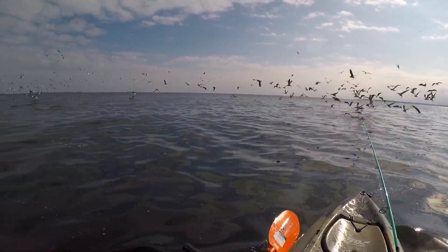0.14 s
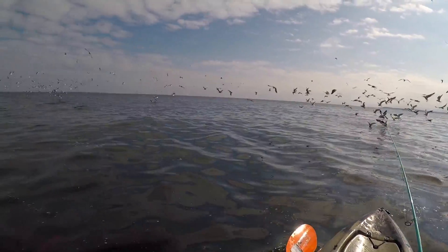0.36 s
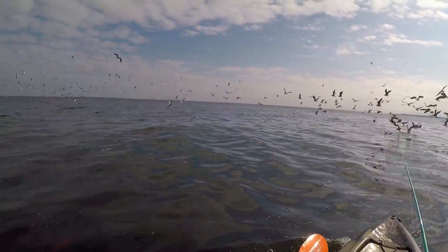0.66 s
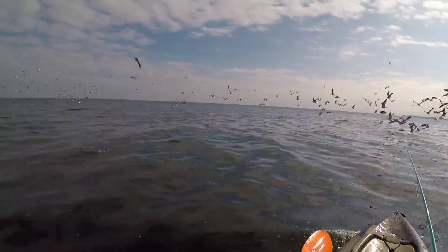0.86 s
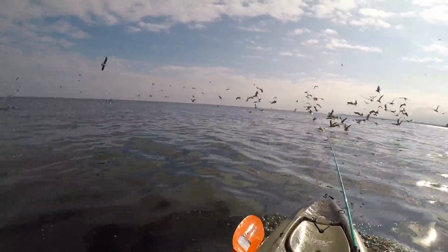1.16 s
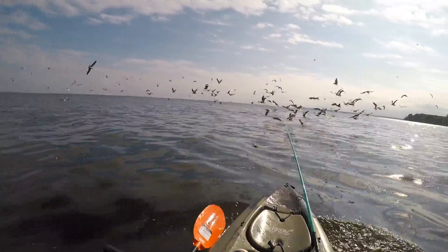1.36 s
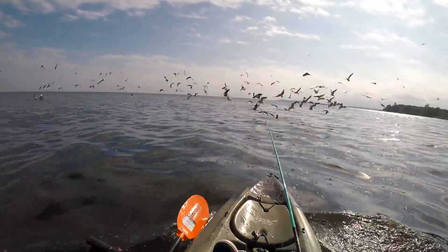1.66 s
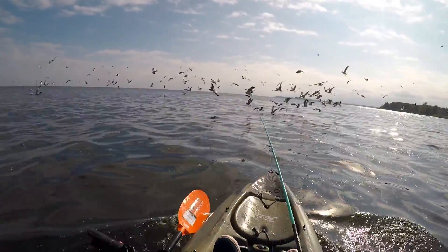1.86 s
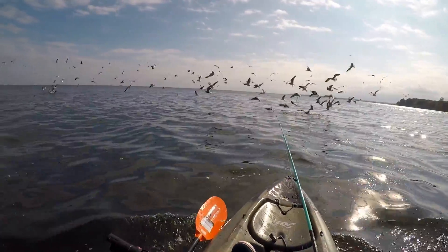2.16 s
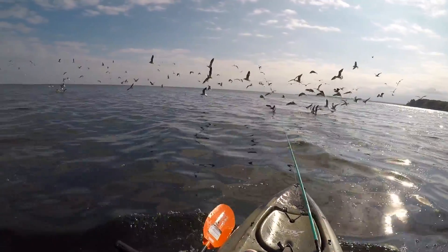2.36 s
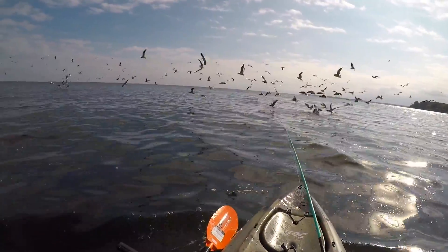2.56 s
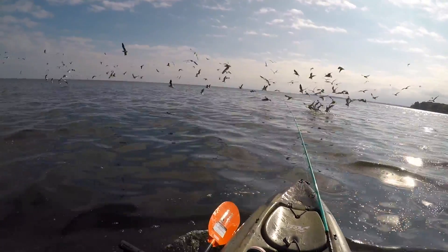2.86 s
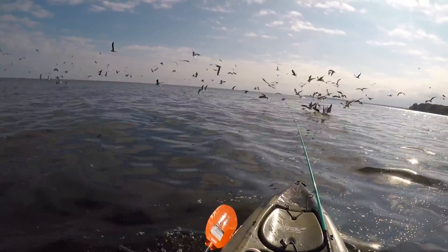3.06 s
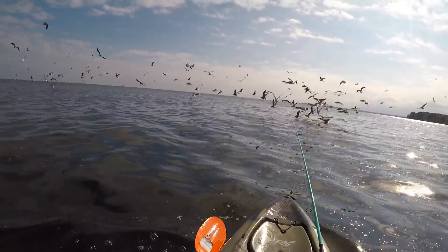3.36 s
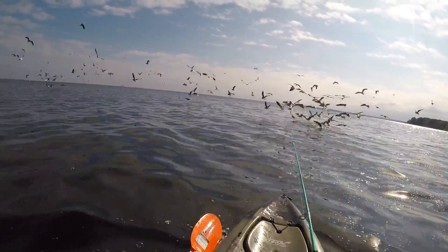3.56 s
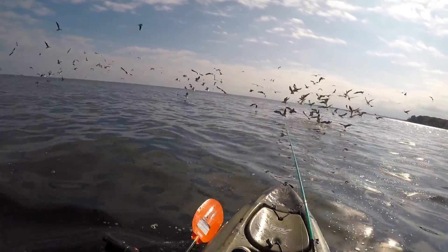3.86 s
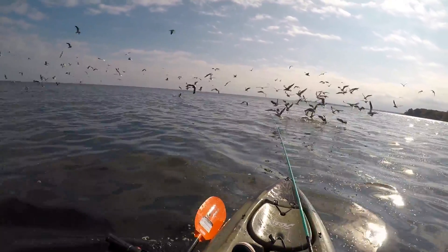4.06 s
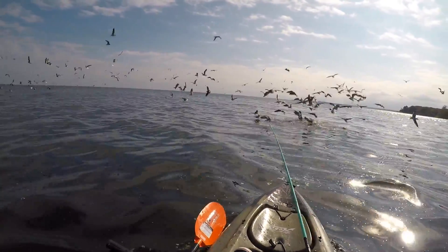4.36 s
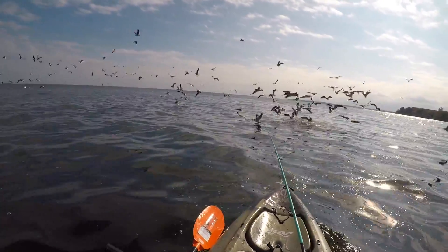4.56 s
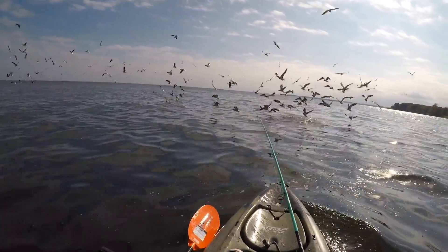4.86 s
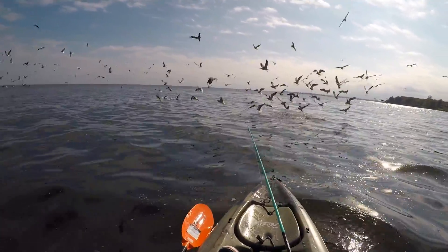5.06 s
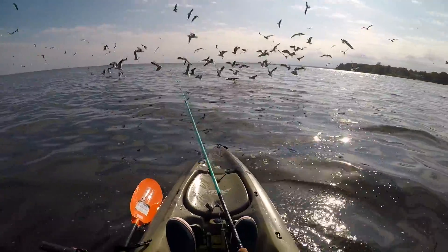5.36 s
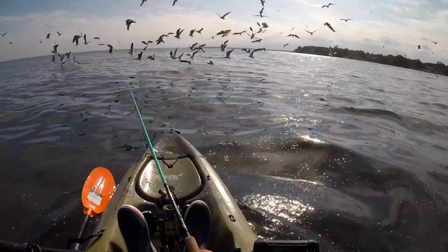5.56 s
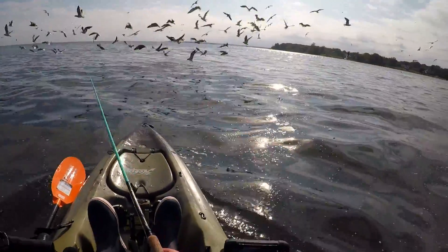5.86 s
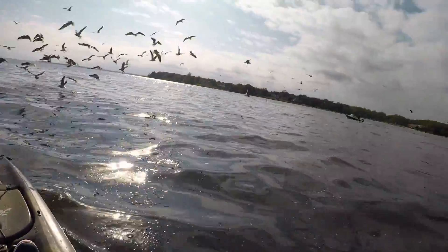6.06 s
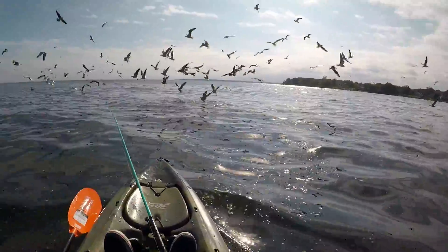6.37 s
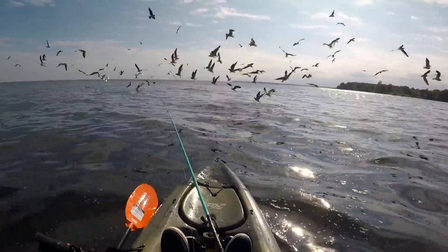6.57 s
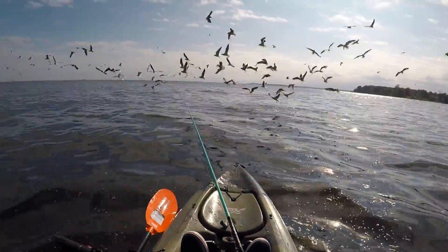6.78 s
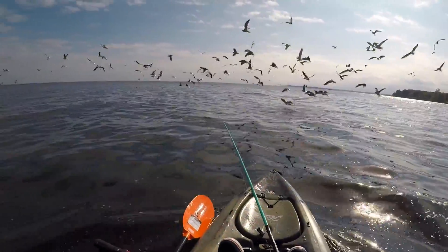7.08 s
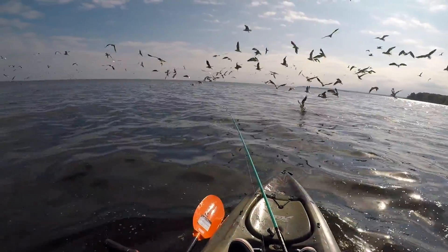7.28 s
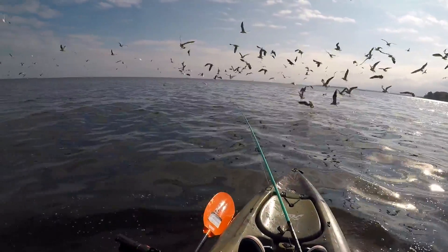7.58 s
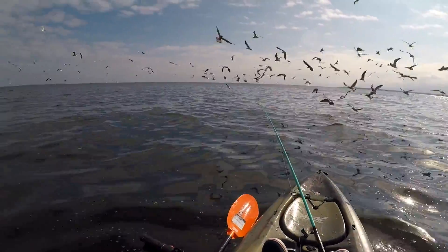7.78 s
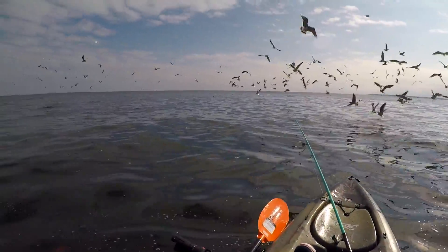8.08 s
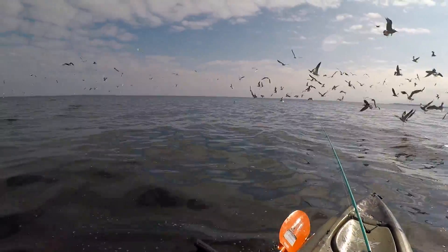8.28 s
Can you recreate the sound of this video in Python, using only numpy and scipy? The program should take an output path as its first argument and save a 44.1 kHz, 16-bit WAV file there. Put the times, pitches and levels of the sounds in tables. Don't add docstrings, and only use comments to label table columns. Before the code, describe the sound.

The sound cuts straight into a flock of gulls feeding over open water, heard from a small boat. Throughout, distant cries merge into a wavering chorus while nearer birds give short hoarse squawks, rasping screams and clear gliding calls. High thin whistles come around 0.5 and 1 s, a loud arched cry at 1.7 s, and a steadier droning call from 2.7 to 3.3 s. Shrill warbles crowd 4 to 5.1 s, with swooping cries near 5.7 s. The far flock thins after about 6 s; low moans appear around 6.5 to 7.3 s, then a shrill wavering call, and the chorus swells again at the end. Low wind rumbles and puffs unevenly across left and right, gusting at the start, near 3.6 s and most strongly at 7.5 s. Faint water hiss continues underneath, with small hull knocks between 3.2 and 4.9 s and occasional tiny tackle clicks. Treble is dull; there is almost no reverberation.

```python
import sys
import numpy as np
from scipy import signal
from scipy.fft import rfft, irfft, next_fast_len
from scipy.io import wavfile
from scipy.ndimage import uniform_filter1d

SR = 44100
rng = np.random.default_rng(int(sys.argv[2]) if len(sys.argv) > 2 else 0)


def attenuation_scalar(level_db):
    decades = np.asarray(level_db, float) / 20
    return 10 ** decades


def persist_wave(psi):
    counts = np.round(np.clip(psi, -1, 1) * 32767).astype(np.int16)
    wavfile.write(sys.argv[1], SR, np.atleast_2d(counts).T)


N = 371760
T = np.arange(N) / SR

# [t/s, f/Hz, level/dB]
SOLO_SHRILL = [
    [(4.0, 3070, -45), (4.05, 3200, -43.5), (4.104, 3290, -41), (4.132, 3050, -36), (4.164, 3140, -39),
     (4.19, 3010, -40), (4.224, 3116, -41), (4.246, 2960, -39.5), (4.275, 2820, -46)],
    [(4.39, 3030, -37.5), (4.44, 3196, -38), (4.49, 3420, -39.5), (4.546, 3210, -42.5), (4.56, 3150, -53)],
    [(5.58, 2950, -43), (5.62, 2950, -43.5), (5.672, 3430, -44), (5.7, 3195, -41), (5.74, 3310, -41.5),
     (5.79, 3010, -39), (5.835, 2840, -44)],
    [(3.67, 3580, -49), (3.716, 3470, -50), (3.754, 3360, -57), (3.776, 3200, -42), (3.9, 3300, -55)],
    [(3.335, 2900, -56), (3.363, 3257, -40), (3.389, 2920, -54), (3.425, 2760, -43)],
    [(.45, 5140, -44), (.5, 5240, -40), (.56, 5320, -41.5), (.585, 5250, -41), (.62, 5040, -56)],
    [(.98, 4875, -47), (1.0, 5420, -43), (1.052, 5600, -52), (1.094, 5260, -48), (1.13, 4550, -56)],
    [(7.13, 3060, -54), (7.2, 3190, -43), (7.235, 3140, -39), (7.25, 2984, -35), (7.275, 3020, -54),
     (7.38, 2970, -51), (7.45, 3010, -46)],
    [(6.55, 2770, -54), (6.63, 2770, -56), (6.68, 2580, -60), (6.73, 2520, -59)],
]
SOLO_OPEN = [
    [(7.5, 2200, -41), (7.56, 2250, -51.5), (7.63, 2406, -47), (7.676, 2180, -41), (7.704, 2137, -43.5),
     (7.765, 2340, -49), (7.8, 2314, -50)],
    [(7.575, 2450, -64), (7.619, 3010, -48), (7.663, 3120, -51), (7.69, 3050, -45), (7.8, 3040, -59)],
    [(5.735, 2380, -45), (5.777, 2446, -46), (5.843, 2544, -41.5), (5.9, 2430, -42.5), (5.955, 2420, -50),
     (5.973, 2014, -45.5), (5.99, 2400, -49), (6.02, 2430, -56)],
    [(2.53, 2900, -50), (2.57, 2540, -50), (2.61, 2430, -53), (2.685, 2460, -57)],
    [(3.765, 2270, -52), (3.787, 2620, -48), (3.825, 2140, -55), (3.87, 2190, -54), (3.93, 2350, -49)],
    [(4.28, 2360, -40), (4.31, 2250, -41), (4.335, 2190, -41), (4.355, 2330, -46)],
]
SOLO_ROUND = [
    [(3.24, 3500, -52), (3.286, 3750, -47), (3.34, 3870, -47), (3.445, 3666, -50), (3.53, 3770, -48.5),
     (3.6, 3570, -49), (3.66, 3320, -51)],
    [(3.37, 3250, -52), (3.396, 2220, -44.5), (3.435, 2240, -42.5)],
    [(3.43, 2450, -59), (3.465, 2800, -58), (3.49, 2915, -52), (3.528, 2174, -46), (3.545, 2000, -40)],
    [(5.225, 4700, -41), (5.249, 4200, -38), (5.26, 3950, -50)],
    [(1.665, 3490, -43), (1.73, 3800, -35), (1.8, 3830, -38.5), (1.83, 3720, -36), (1.87, 3770, -38),
     (1.93, 3600, -41.5), (2.02, 3210, -42)],
]
SOLO_LOW = [
    [(6.615, 1070, -47), (6.69, 1133, -54), (6.73, 1093, -52), (6.83, 1136, -48.5), (6.92, 1070, -48.5),
     (7.05, 1120, -59)],
    [(7.85, 1164, -59), (7.92, 1116, -51.5), (7.99, 1088, -54)],
    [(8.06, 1510, -56), (8.1, 1540, -57), (8.18, 1497, -53)],
    [(6.483, 1194, -56), (6.52, 1440, -50.5), (6.556, 1530, -55)],
]
SOLO_ARCH = [
    [(6.97, 1440, -46), (7.03, 1647, -42.5), (7.12, 1615, -43.5), (7.23, 1513, -40.5), (7.28, 1390, -50)],
]
SOLO_TWIN = [
    [(.33, 3510, -48), (.41, 3330, -49), (.44, 3220, -58), (.5, 3030, -60)],
    [(4.668, 1200, -51), (4.7, 1540, -47), (4.72, 1950, -46)],
    [(3.335, 1400, -54), (3.365, 1690, -46.5), (3.385, 1440, -47)],
    [(4.75, 3330, -42), (4.79, 3540, -35.5), (4.83, 3680, -39), (4.89, 3620, -35.5), (4.94, 3730, -36)],
    [(4.955, 3560, -41), (5.01, 3300, -38.5), (5.05, 3430, -35.5), (5.09, 3250, -36)],
    [(5.09, 3530, -50), (5.12, 3300, -50)],
    [(5.635, 3200, -39), (5.69, 2940, -44), (5.76, 2650, -50)],
    [(2.63, 3200, -50), (2.655, 2880, -46), (2.68, 3300, -46), (2.7, 3000, -50)],
]
SOLO_DRONE = [
    [(2.655, 2100, -52), (2.72, 2090, -47), (2.84, 2115, -45), (2.93, 2185, -44), (2.97, 2150, -52)],
    [(3.05, 2180, -44), (3.15, 2224, -42.5), (3.22, 2360, -42.5), (3.29, 2300, -49.5), (3.315, 1950, -41)],
]
SOLO_BURRED = [
    [(4.8, 2880, -48), (4.818, 3080, -38), (4.842, 2910, -42), (4.886, 3242, -39.5), (4.922, 2836, -41.5),
     (4.97, 3090, -40.5), (5.02, 2900, -47)],
    [(4.575, 3000, -50), (4.61, 2900, -47.5), (4.645, 2760, -50)],
]
# [level/dB of partial 1, 2, 3, ..]
SOLO_PARTIALS = [
    (-3, 0, -29.5),
    (-9.5, 0.5, -5, -17.5),
    (0, -13.5, -38),
    (-9.5, -6.5, 2.5, -1.5, -1.5, -13.5, -26, -19),
    (-19.5, -10.5, 2, -9.5, -10, -15.5),
    (0.5, -7.5, -28),
    (0, -11, -12, -32),
    (-9.5, 0.5, -26),
]
# [t/s, length/s, f/Hz, glide/share of pitch, level/dB]
MELLOW = [(0.36, 0.23, 2400, -0.02, -55), (0.37, 0.15, 1070, -0.072, -51),
          (0.845, 0.12, 2300, -0.027, -48.5), (.96, .1, 2180, 0.0063, -49), (.64, .09, 2400, -.03, -54),
          (0.96, 0.15, 2400, 0.025, -45.5), (1.32, 0.245, 2260, -0.038, -45.5),
          (1.235, 0.069, 1950, 0.056, -43), (1.05, .1, 2300, .01, -49), (2.015, 0.15, 1880, -0.032, -49.5),
          (1.85, 0.24, 2350, -.06, -48), (2.175, .07, 2400, -.02, -46.5), (2.2, 0.107, 2150, .04, -45),
          (2.35, 0.16, 1070, 0.1, -48.5), (2.3, 0.108, 1170, -0.043, -42), (2.4, 0.071, 2400, 0.032, -46.5),
          (4.735, 0.025, 2350, 0.018, -43), (3.456, 0.068, 1437, 0.037, -49.5),
          (3.715, .09, 2050, -0.0043, -58), (5.454, 0.38, 2080, 0.073, -50.5),
          (9, 0.049, 2300, -0.143, -50.5), (7.72, 0.121, 2700, 0.032, -46.5),
          (0.011, 0.044, 2230, -0.017, -48)]
ROUND = [(1.305, 0.068, 1180, -0.017, -41), (1.375, .1, 1115, 0.0016, -53),
         (1.3, 0.062, 3720, -0.052, -45.5), (2.17, .14, 3200, -.01, -45.5), (3.815, .09, 3900, -.04, -52),
         (3.82, .09, 3030, 0.087, -54), (2.73, .06, 4150, -0.056, -44), (8.36, 0.072, 4150, 0.076, -50.5),
         (1.853, 0.11, 1200, -0.04, -47.5), (3.475, 0.038, 3400, 0.15, -49.5),
         (4.49, 0.076, 3330, -0.042, -42.5), (4.002, 0.11, 1080, -0.012, -49),
         (4.495, 0.14, 3900, -0.04, -50), (6.9, 0.051, 3200, 0.109, -44.5),
         (.685, 0.029, 2750, 0.016, -51.5)]
OPEN = [(.095, 0.22, 2380, -.03, -56), (.82, .2, 2230, .03, -52), (0.013, 0.044, 2280, -0.086, -45),
        (0.044, .06, 3340, -0.06, -53.5), (1.571, 0.15, 2390, 0.072, -50), (4.32, 0.053, 2900, 0.053, -52),
        (4.99, 0.235, 2350, -0.012, -45.5), (5.56, 0.14, 2380, 0.05, -47.5),
        (6.193, 0.24, 1580, -0.051, -45.5), (8.2, 0.09, 1127, -0.054, -57), (7.7, 0.093, 1480, 0.11, -46),
        (1.275, 0.041, 2330, -0.03, -44), (1.18, .03, 2150, .08, -47), (1.335, .04, 2280, -.1, -49),
        (7.45, .18, 2370, .04, -50.5), (4.6, .05, 2100, 0.057, -50)]
SHRILL = [(1.2, 0.065, 3000, -0.029, -46), (4.5, 0.051, 4200, 0.026, -48), (.772, 0.1, 3260, 0.0081, -51.5),
          (.5, .13, 3080, -.01, -56), (2.165, 0.15, 1385, -0.05, -48.5), (3.04, 0.115, 2900, 0.066, -47),
          (1.122, 0.04, 3150, .01, -45), (3.4, .09, 1140, .03, -48), (7.0, 0.05, 3170, 0.02, -47.5)]
BILL_HZ = (2400, 3935, 4820, 5700)
# [t/s, peak level/dB, length/s]
HOARSE_SQUAWKS = [(0.2092, -34.5, 0.11), (0.2917, -26.5, 0.051), (0.86, -28.5, 0.051), (1.4996, -31, 0.074),
                  (1.8466, -28, 0.042), (2.1244, -22, 0.034), (2.5194, -23, 0.039), (2.8384, -21, 0.048),
                  (2.9494, -28, 0.035), (3.059, -27, 0.11), (3.5494, -29.5, 0.068), (3.91, -31, 0.07),
                  (4.2489, -44, 0.054), (4.3489, -24.5, 0.058), (4.7047, -24, 0.071),
                  (5.2983, -35.5, 0.055), (5.528, -23.5, 0.076), (6.06, -33.5, 0.027), (6.41, -28.5, 0.052),
                  (6.5694, -35.5, 0.066), (7.235, -31.5, 0.039), (7.375, -37, 0.022), (7.4066, -29, 0.031),
                  (5.70, -30, .03), (5.83, -31, 0.045), (7.8, -33, 0.057), (1.93, -31, 0.036),
                  (2.3, -33, .04), (8.176, -31.5, 0.072), (8.345, -34.5, 0.1)]
CLEAR_SQUAWKS = [(0.7693, -25, 0.051), (2.455, -27.5, 0.036), (3.3508, -31, 0.084), (3.777, -33.5, 0.049),
                 (6.1456, -24.5, 0.043), (6.9327, -21, 0.039), (7.47, -27, 0.03), (7.235, -30, .03)]
SCREAMS = [(1.1, -23.5, 0.06), (1, -27.5, 0.07), (1.8, -30.5, 0.21), (2.2, -29.5, 0.21), (3, -28.5, .05),
           (3, -29.5, 0.24), (0.5, -30.5, 0.092), (4, -33, 0.11), (4.5, -32.5, 0.085), (5, -35, .05),
           (5, -32, 0.11), (3.0, -32, .16), (2.32, -35, 0.089), (4, -32, .08), (7.5, -41.5, 0.18)]
# [f/Hz, width/Hz, level/dB]
THROAT = [(2154, 1115, -6), (3637, 514, 1), (4324, 444, -0.5), (5945, 1120, -1)]
# [f/Hz, level/dB]
GAPE = [(1500, -1), (2200, 1.5), (2650, -2), (3250, 3), (4200, 1.5), (4950, -5), (5800, 3), (7400, -2)]
# [t/s, level/dB]
CHORUS = [(0.0, -48), (1.24, -39.5), (1.62, -42.5), (1.9, -40.5), (2.79, -39.5), (2.98, -39), (3.3, -41),
          (3.57, -48), (3.83, -43.5), (4.25, -38), (4.69, -46), (4.95, -38), (5.4, -41), (5.75, -40),
          (5.96, -49), (6.88, -47), (7.0, -45), (8.3, -48), (8.43, -35.5)]
# [t/s, left minus right level/dB]
BEARING = [(0.0, -0.5), (2.02, -0.5), (2.39, -1.5), (2.74, 0), (3.12, -1.5), (6.17, 3), (6.24, 0),
           (6.81, 1.5), (7.16, 2), (7.3, 0.5), (7.84, -1), (7.98, -6), (8.03, 0), (8.43, -4)]
# [t/s, level/dB, left minus right level/dB]
WIND = [(0.0, -42, -2.5), (0.33, -49.5, 5), (1.74, -44.5, 0.5), (1.85, -47.5, 10), (1.95, -54.5, -3),
        (2.13, -50, 1), (2.79, -52, 1.5), (3.64, -40.5, 0.5), (4.53, -55, -3), (5.71, -51, -6.5),
        (5.75, -46.5, -5.5), (6.1, -46, 3.5), (6.17, -45, 1.5), (6.76, -50.5, -1.5), (7.49, -38.5, 3.5),
        (7.61, -49, 1), (8.19, -43.5, -1.5), (8.43, -40.5, 4.5)]
# [f/Hz, level/dB per Hz]
WIND_COLOUR = [(14, -24), (54, -8.5), (103, -9), (170, -8.5), (260, -6.5), (500, -24.5), (900, -41.5),
               (1980, -98.5)]
# [t/s, length/s, extra level/dB of the upper edge]
BUFFETS = [(7.33, 0.047, 7.5), (7.57, 0.037, 8), (1.73, 0.042, 5), (3.22, 0.042, 4.5), (4.35, .1, 5),
           (4.75, 0.12, 5), (2.51, 0.36, 2), (6.52, .04, 3.5)]
# [f/Hz, level/dB per Hz]
SEA_COLOUR = [(290, -19.5), (940, -10.5), (1900, -10.5), (6180, -24), (7780, -34.5), (10100, -30.5),
              (12000, -31.5), (17100, -14.5)]
# [t/s, peak level/dB]
WAVELETS = [
    (3.218, -31.5),
    (3.541, -27),
    (4.62, -29.5),
    (4.883, -33),
]
# [t/s, peak level/dB]
TACKLE = [
    (.845, -41),
    (1.85, -47),
    (2.569, -37),
    (4.249, -32),
]
# [f/Hz, level/dB]
WIDTH = [(100, 0), (400, -4), (1200, 1), (2200, 7), (5000, 0.5), (9000, 13.5), (12000, -1.5)]


def level(x, db):
    return x * attenuation_scalar(db) / np.sqrt(np.mean(x ** 2))


def colour(x, points):
    hz, db = np.transpose(points)
    size = next_fast_len(N, True)
    f = np.arange(size // 2 + 1) * SR / size + 1
    gain = attenuation_scalar(np.interp(np.log(f), np.log(hz), db))
    return irfft(rfft(x, size) * gain, size)[..., :N]


def walk(rate, size=N):
    hold = max(int(SR / rate), 2)
    steps = np.repeat(rng.standard_normal(size // hold + 1), hold)
    return 1.3 * uniform_filter1d(uniform_filter1d(steps, hold), hold)[:size]


def lean(points):
    return attenuation_scalar(np.outer([.5, -.5], np.interp(T, *np.transpose(points))))


def add(out, x, s, pan_db):
    db_per_sample = 3
    for c, sign in enumerate((1, -1)):
        i = int(s * SR) + max(int(-sign * pan_db / db_per_sample), 0)
        out[c, i:i + len(x)] += x[:N - i] * attenuation_scalar(sign * pan_db / 2)


def voice(hz, partials, waver, flutter_db):
    size = len(hz)
    phase = 2 * np.pi * np.cumsum(hz * (1 + waver * walk(180, size=size))) / SR
    stack = sum(attenuation_scalar(db) * np.sin(k * phase + k * k) for k, db in partials)
    to_edge = np.minimum(np.arange(size), np.arange(size)[::-1])
    fade = np.clip(to_edge / (0.0099 * SR), 0, 1)
    return np.sqrt(2) * stack * fade * attenuation_scalar(flutter_db * walk(62.1, size=size))


def throat(x):
    out = 0
    for k, (hz, width, db) in enumerate(THROAT):
        edges = (hz - width / 2, hz + width / 2)
        band = signal.butter(1, edges, "band", fs=SR, output="sos")
        out = out + (-1) ** k * attenuation_scalar(db) * signal.sosfilt(band, x)
    return out


def soloists():
    out = np.zeros((2, N))
    kinds = (SOLO_SHRILL, SOLO_OPEN, SOLO_ROUND, SOLO_LOW, SOLO_ARCH, SOLO_TWIN, SOLO_DRONE, SOLO_BURRED)
    for cries, dbs in zip(kinds, SOLO_PARTIALS):
        for cry in cries:
            s, hz, db = np.transpose(cry)
            t = np.arange(s[0], s[-1], 1 / SR)
            pitch = uniform_filter1d(np.interp(t, s, hz), size=400, mode="nearest")
            partials = list(enumerate(dbs, 1))
            if hz.max() > 4500:
                partials = [(1, 0)]
            if cries is SOLO_BURRED:
                partials += [(k / 6, -8) for k in (7, 8, 9, 10, 11, 13, 14)]
            sung = voice(pitch, partials, waver=0.0041, flutter_db=2.5)
            add(out, sung * attenuation_scalar(np.interp(t, s, db)), s[0], 0)
    return out


def near_birds():
    below_db_oct, above_db_oct, scatter_db = 17, 23, 2.5
    sag, swell = .05, 0.11
    warble, warble_hz = 0.01294, 36.3
    out = np.zeros((2, N))
    for cries, bill_hz in zip((MELLOW, ROUND, OPEN, SHRILL), BILL_HZ):
        mellow = bill_hz < 3000
        chances = rng.standard_normal((len(cries), 12))
        for (s, length, hz, glide, db), chance in zip(cries, chances):
            u = np.linspace(0, 1, int((length + 0.01095) * SR))
            arch = glide * (u - .5) - sag * (2 * u - 1) ** 4
            pitch = hz * (1 + arch + warble * (hz > 2800) * walk(warble_hz, size=len(u)))
            k = np.arange(1, int(10800 / hz) + 1)
            octaves = np.log2(k * hz / bill_hz)
            dbs = np.where(octaves > 0, -above_db_oct, below_db_oct) * octaves
            dbs = dbs - dbs.max() + scatter_db * chance[k] * (dbs < dbs.max())
            cry = voice(pitch, zip(k, dbs), waver=0.00753 + 0.0079 * mellow, flutter_db=2.5 + 0.98 * mellow)
            cry = cry * np.sin(np.pi * u) ** swell
            add(out, cry * attenuation_scalar(db + 2.0), max(s - .006, 0), 2.4 * chance[0])
    return out


def squawks():
    pulse_hz = 564
    out = np.zeros((2, N))
    kinds = ((HOARSE_SQUAWKS, .05, 2.5, .35, -.2),
             (CLEAR_SQUAWKS, .008, 1.5, .12, -.3),
             (SCREAMS, .05, 3.5, .35, -.5))
    for rows, waver, flutter_db, rasp, tilt_db in kinds:
        partials = [(k, tilt_db * (k - 6)) for k in range(3, 18)]
        for (s, db, length), side in zip(rows, rng.standard_normal((len(rows), 2))):
            u = np.linspace(0, 1, int(1.5 * length * SR))
            rise = .86 + .2 * np.sin(2.2 * u)
            pitch = pulse_hz * (1 + .04 * side[1]) * rise * (1 + waver * walk(700, size=len(u)))
            pulses = voice(pitch, partials, waver / 3, flutter_db)
            pulses = pulses * (1 + rasp * rng.standard_normal(len(u)))
            add(out, pulses * np.sin(np.pi * u ** 0.54) * attenuation_scalar(db - 19.0), max(s - .008, 0), 3.3 * side[0])
    return colour(throat(out), GAPE)


def chorus(count=470):
    out = np.zeros((2, N))
    for when, high, tune, long, bend, loud, side, hoarse in rng.random((count, 8)):
        u = np.linspace(0, 1, int((.05 + .17 * long ** 2) * SR))
        register_hz = 1050 + 500 * tune ** 2 if high < .6 else 2100 + 1400 * tune
        hz = register_hz * (1 + .2 * (u * (1 - u) * 4 - 1) * bend - .06 * u)
        top = hz.max()
        partials = [(k, -14 * rng.random() - top * k / 1400.0) for k in range(1, int(9000 / top) + 1)]
        cry = voice(hz, partials, 0.00513 + 0.045 * hoarse ** 2, 4.5)
        add(out, cry * np.sin(np.pi * u) ** .5 * attenuation_scalar(-4 * loud), when * (N - 1) / SR, 13 * (side - .5))
    blur = level(rng.standard_normal(N) * attenuation_scalar(3.0 * walk(9)), -7)
    out = throat(level(out, 0) + blur)
    return level(out, -0.98) * attenuation_scalar(np.interp(T, *np.transpose(CHORUS)))


def wind():
    calm_db, split_hz = -50, 130
    rumble_db, rumble_share = -32 + 1.5, 0.71
    edge_db, edge_share = -45.5 + 7.0, 0.95
    s, db, pan_db = np.transpose(WIND)
    gust = np.interp(T, s, db) - calm_db
    below = signal.butter(2, split_hz, fs=SR, output="sos")
    above = signal.butter(2, split_hz, "high", fs=SR, output="sos")
    rumble, edge = np.zeros((2, N)), np.zeros((2, N))
    puffs = walk(11)
    for c in range(2):
        noise = colour(rng.standard_normal(N), WIND_COLOUR)
        rumble[c] = signal.sosfilt(below, noise) * attenuation_scalar(0.9 * puffs + 1.1 * walk(5.4))
        edge[c] = signal.sosfilt(above, noise) * attenuation_scalar(1.6 * puffs + 2.4 * walk(30))
    edge[1] -= 0.4 * edge[0]
    buffet_db = sum(extra * np.exp(-((T - at) / length) ** 2) for at, length, extra in BUFFETS)
    both = level(rumble, rumble_db) * attenuation_scalar(rumble_share * gust)
    both = both + level(edge, edge_db) * attenuation_scalar(edge_share * gust + buffet_db)
    both[1] -= 0.16 * both[0]
    return both * lean(np.transpose([s, pan_db]))


def sea():
    out = level(colour(rng.standard_normal((2, N)), SEA_COLOUR), -50) * attenuation_scalar(0.46 * walk(4.4))
    lowpass = signal.butter(2, 1800, fs=SR, output="sos")
    out[1] -= 0.31 * signal.sosfilt(lowpass, out[0])
    t = np.arange(600) / SR
    for s, db in WAVELETS:
        ring = np.sin(2 * np.pi * 800 * t) * np.exp(-t / 0.00069)
        splash = 0.066 * rng.standard_normal(600) * np.exp(-t / 0.00099)
        add(out, (ring + splash) * attenuation_scalar(db + 5), s, 0)
    for s, db in TACKLE:
        burst = rng.standard_normal(600) * np.exp(-t / 0.0011)
        add(out, np.diff(np.diff(burst)) * attenuation_scalar(db - 2.5), s, 0)
    return out


def scene():
    birds = (soloists() + near_birds() + squawks() + chorus()) * lean(BEARING)
    mirror = np.array([np.roll(birds[0], 61), np.roll(birds[1], 97)])
    return birds + 0.064 * mirror + wind() + sea()


def drop_masked_treble(x):
    drop_hz, drop_db, drop_db_oct = 7600, -21, 30
    f, _, z = signal.stft(x, SR, nperseg=1024)
    patch = uniform_filter1d(np.abs(z).mean(axis=0), size=9, axis=0)
    patch = uniform_filter1d(patch, size=3, axis=1)
    patch = np.repeat(patch[::8], 8, axis=0)[:len(f)]
    calls = patch[(f > 1800) & (f < drop_hz)].mean(axis=0)
    calls = calls + attenuation_scalar(-23) * patch[(f > 200) & (f < 500)].mean(axis=0)
    octaves = np.log2(np.maximum(f, drop_hz) / drop_hz)
    mask = attenuation_scalar(drop_db - drop_db_oct * octaves) * (f > drop_hz)
    return signal.istft(z * (patch > np.outer(mask, calls)), SR, nperseg=1024)[1][:, :N]


def top_cut(x):
    return signal.sosfilt(signal.butter(12, 15650, fs=SR, output="sos"), x)


def record(dry):
    mid = (dry[0] + dry[1]) / 2
    side = colour((dry[0] - dry[1]) / 2, WIDTH)
    # (f/Hz, level/dB)
    housing = [(20, -2.5), (6600, -1.0), (7600, -5.5), (9500, -8.0), (11000, -8.5), (15000, -15), (16000, -66.5)]
    mix = drop_masked_treble(colour(np.array([mid + side, mid - side]), housing))
    return top_cut(mix)


dry = scene()
out = record(dry)
persist_wave(out)
```